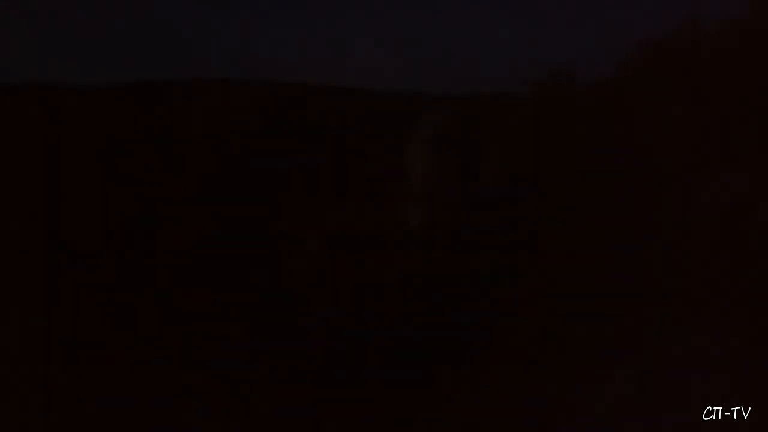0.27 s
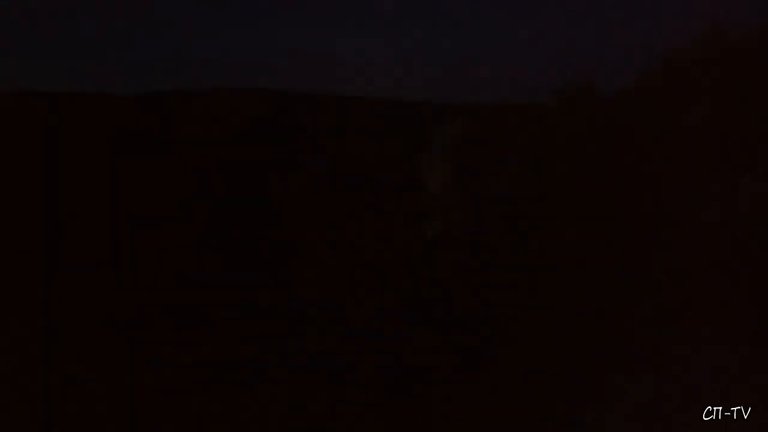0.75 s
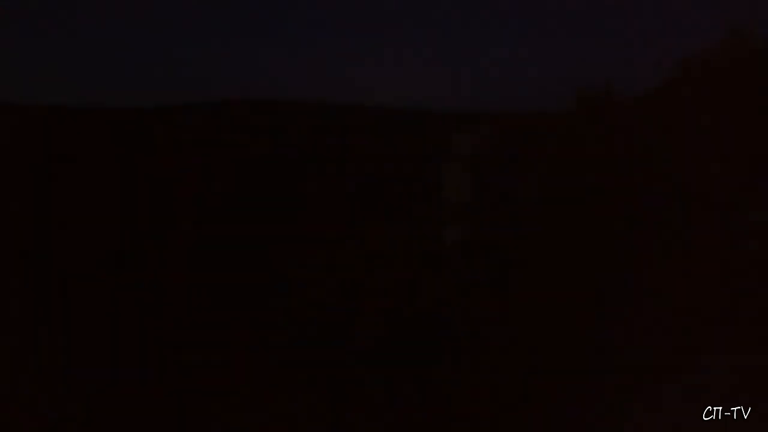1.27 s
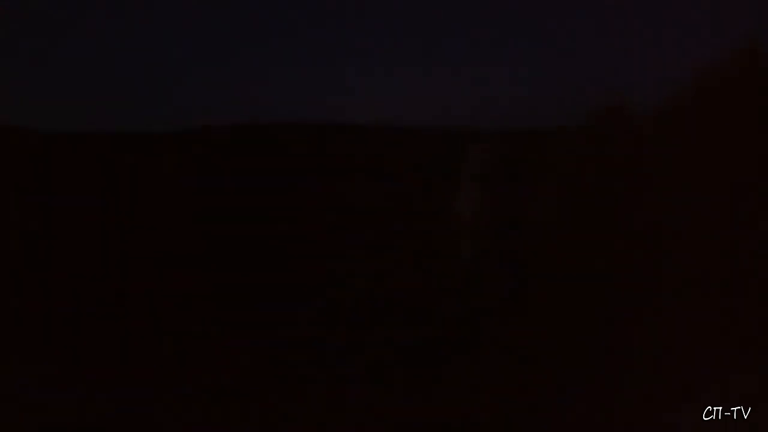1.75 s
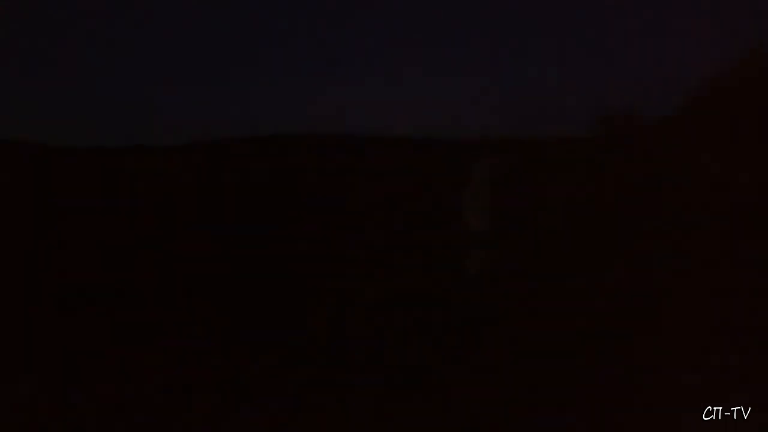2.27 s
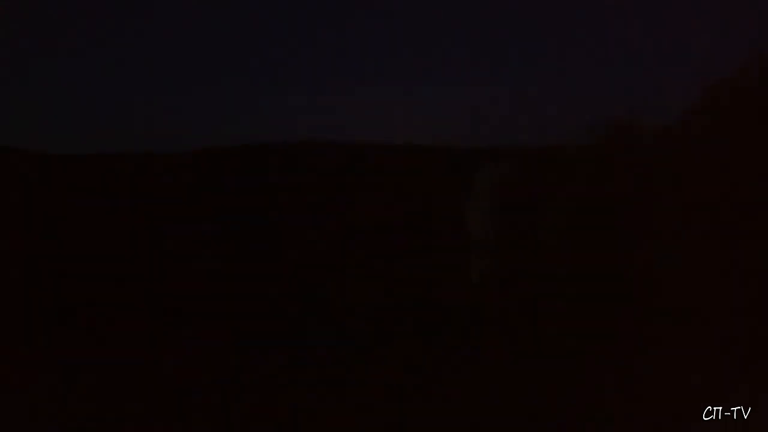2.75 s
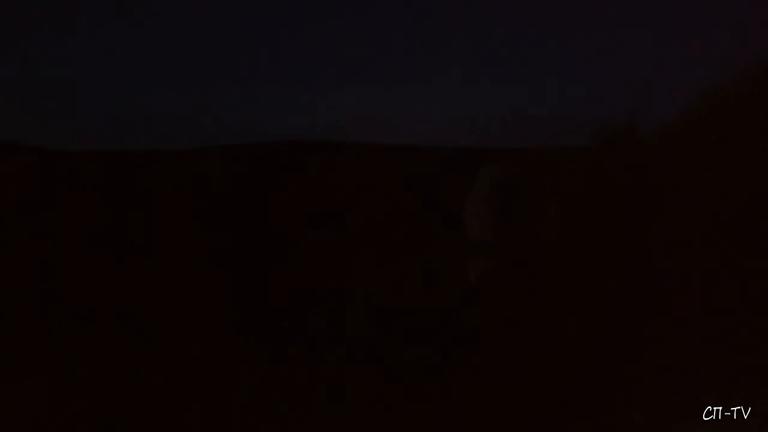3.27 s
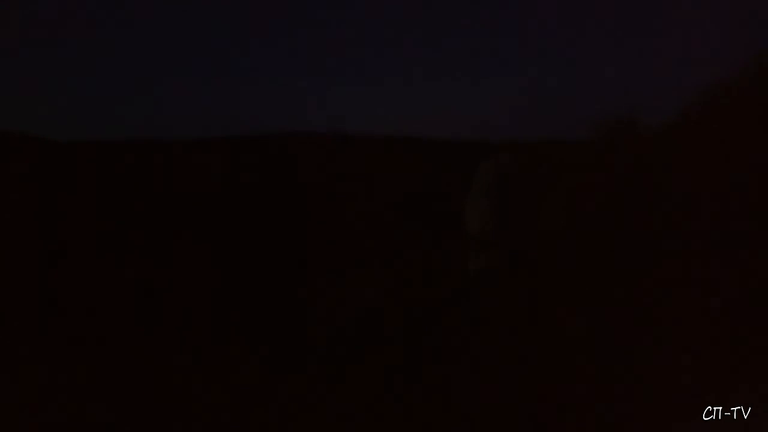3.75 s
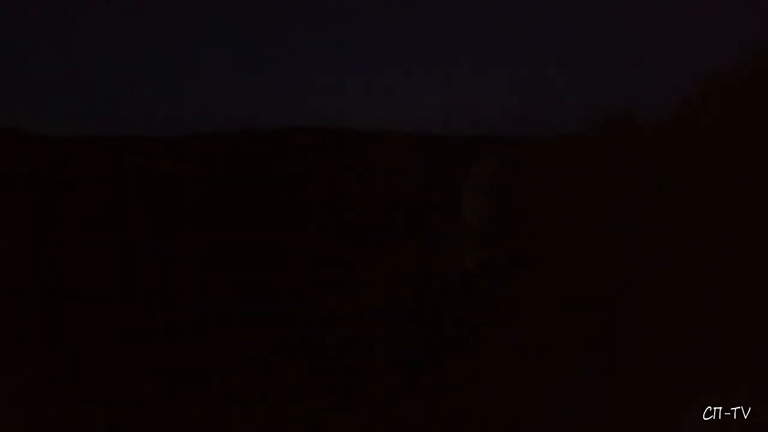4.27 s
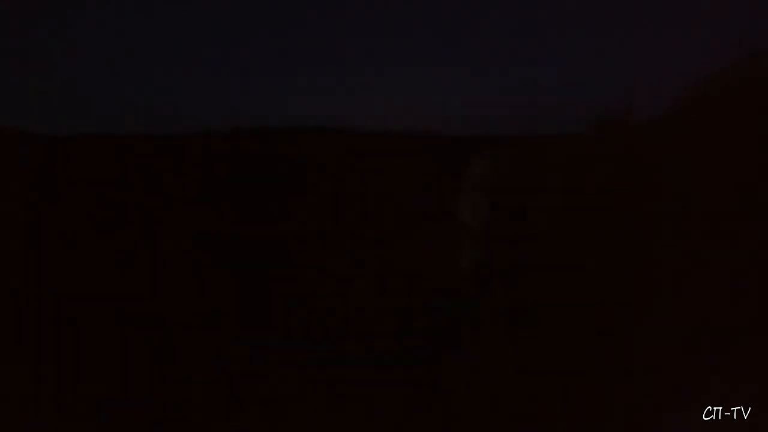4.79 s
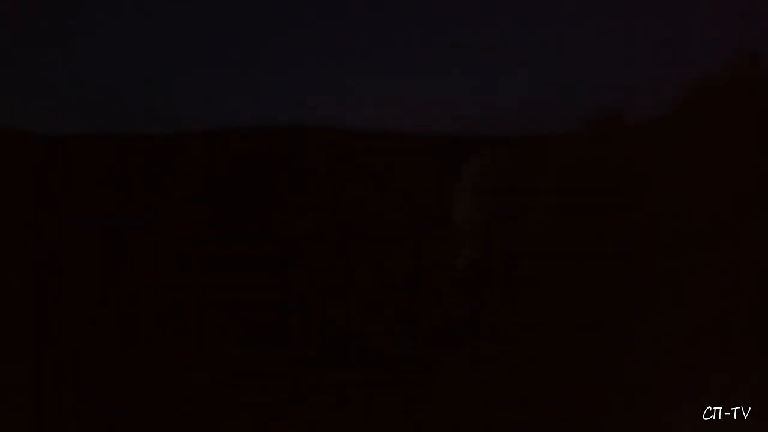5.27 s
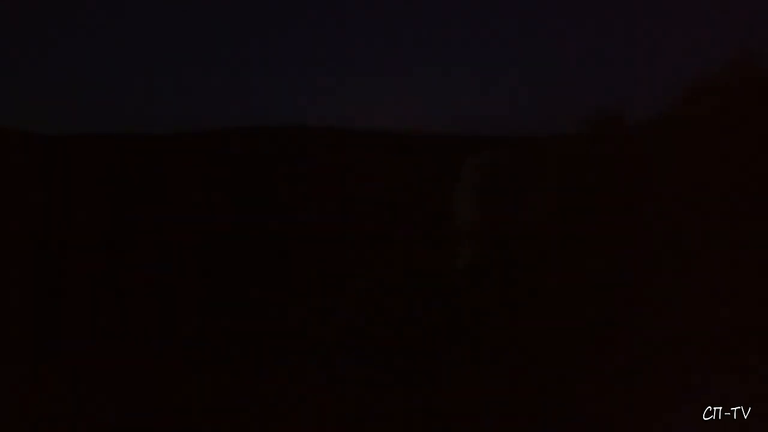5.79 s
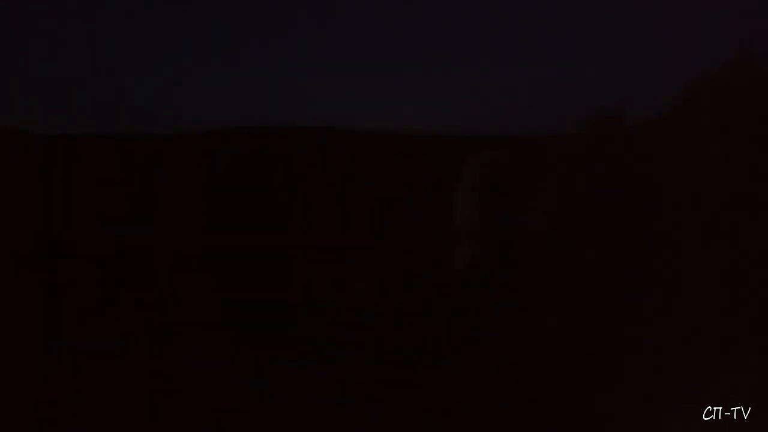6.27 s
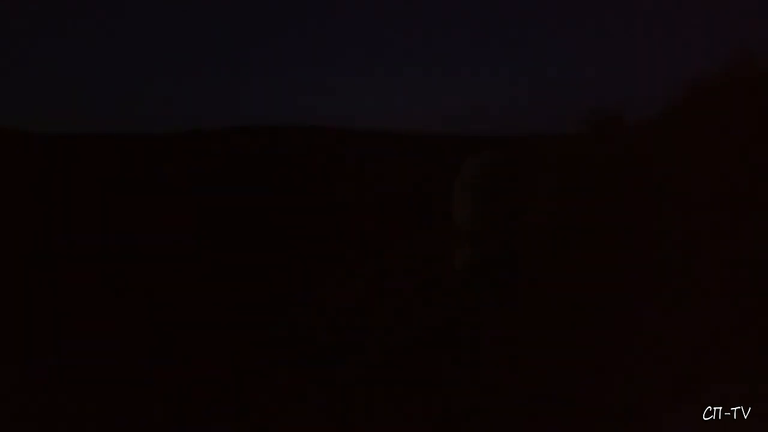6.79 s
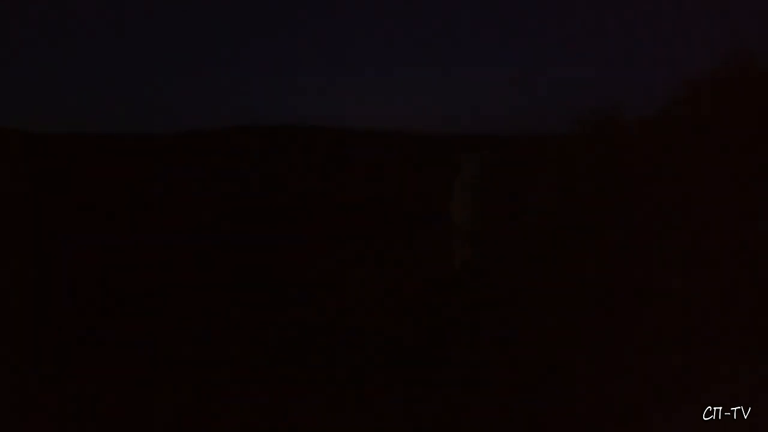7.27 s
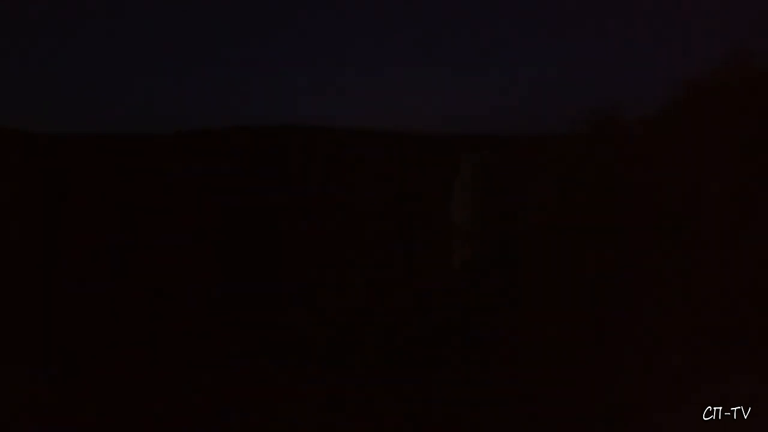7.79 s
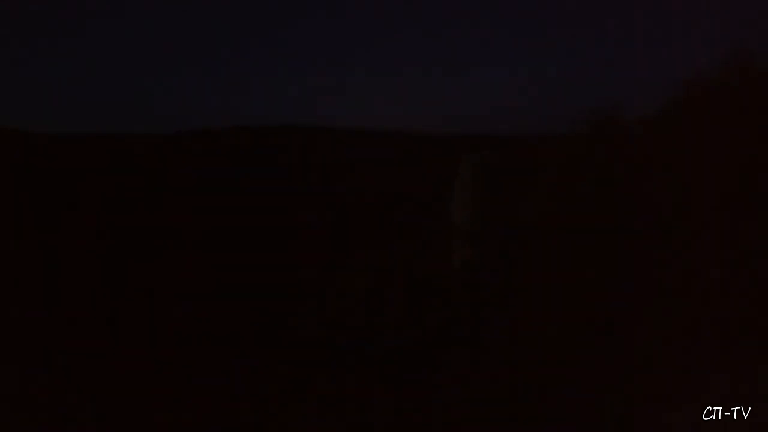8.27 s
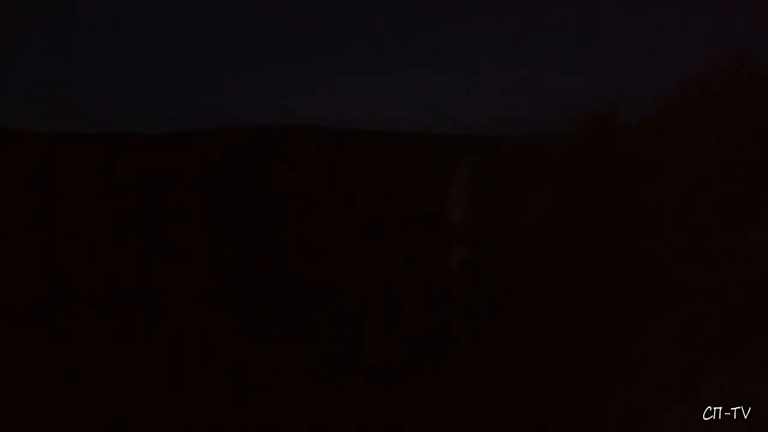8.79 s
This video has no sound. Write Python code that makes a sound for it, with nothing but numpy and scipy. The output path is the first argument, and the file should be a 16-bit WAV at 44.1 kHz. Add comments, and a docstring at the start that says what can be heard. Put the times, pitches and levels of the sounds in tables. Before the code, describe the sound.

Outdoor chorus before dawn, wide and reverberant. Mid-distance thrushes whistle short, sliding notes constantly while farther birds merge into a swelling wash. A clear robin sings high, quick glides at about two to three seconds; later come small trills, two sharp upward whips and regular pulsed flicks. A dull click sounds near the start, with a soft microphone bump later and quiet background air.

```python
"""Dawn chorus at the edge of a wood

A robin sings close by, thrushes whistle further off, small birds trill and buzz, far ones merge into a wash.
Voices are gliding sines, with a fast warble for the buzzes; the trees scatter them into echoes and a tail.
Beneath lie a faint far rumble and a high hiss of shaped noise, a thin tone, a hoot, clicks and a soft bump."""
import sys
import numpy as np
from scipy import signal
from scipy.fft import rfft, irfft
from scipy.io import wavfile
from scipy.ndimage import uniform_filter1d

SR = 44100
rng = np.random.default_rng(int(sys.argv[2]) if len(sys.argv) > 2 else 0)


def output_pcm(signal):
    """Save a mono or channel-first signal as 16-bit PCM at the path in sys.argv[1].

    Samples are clipped to [-1, 1] before scaling.
    """
    pcm = np.clip(np.atleast_2d(signal).T, -1, 1) * 32767
    wavfile.write(sys.argv[1], SR, np.round(pcm).astype(np.int16))


N = 398663
TIME = np.arange(N) / SR  # seconds

# How the wood answers a near, a middling and a far source. Each holds: level of the separate echoes
# in dB against the direct sound, their 60 dB decay time in seconds, then the same two for the deep tail.
CLOSE = (-5.5, .24, -15.5, .85)
MIDWAY = (-3.5, .3, -10.5, .9)
FAR = (0.5, .35, -4, 1.1)
# Swelling of the far whistlers. Each row: time in seconds, level in dB before the layer's gain.
WHISTLER_SWELL = [(0.1, -37.5), (0.37, -41), (0.75, -38.5), (0.89, -42.5), (2.66, -43), (2.86, -40),
                  (3.11, -40), (3.61, -44), (3.98, -47), (4.98, -44), (5.08, -43), (5.3, -51),
                  (5.43, -40.5), (5.8, -40.5), (7.52, -37), (7.67, -44.5), (8.66, -39.5), (9.04, -46)]


def from_db(db):
    """Decibels are twenty times the logarithm of an amplitude ratio; this inverts them."""
    return 10 ** (np.asarray(db) / 20)


def rms_one(x):
    """Root-mean-square normalisation: equal mean power for every sound."""
    return x / np.sqrt(np.mean(x ** 2) + 1e-20)


def add(track, s, sound):
    """Superposition: pressures add, here from time s in seconds."""
    i = int(round(s * SR))
    lo, hi = max(i, 0), min(i + len(sound), N)
    if hi > lo:
        track[lo:hi] += sound[lo - i:hi - i]


def wander(rate):
    """Band-limited chance: Gaussian knots, rate of them a second, joined by straight lines."""
    knots = rng.standard_normal(N // 20)
    return np.interp(TIME * rate, np.arange(len(knots)), knots)


def coloured_noise(spectrum):
    """Spectral shaping: white noise is weighted frequency by frequency, then set to rms 1."""
    hz, db = np.transpose(spectrum)
    bins = np.maximum(np.arange(N // 2 + 1) * SR / N, 1)
    weights = from_db(np.interp(np.log(bins), np.log(hz), db))
    return rms_one(irfft(rfft(rng.standard_normal(N)) * weights, N))


def whistle(length, first, middle, last, edge=0.083, bend=0):
    """Frequency modulation: a sine's phase sums a pitch that arcs through three values; rms 1."""
    u = np.linspace(0, 1, max(int(length * SR), 8))
    # the parabola through the first, middle and last pitch
    hz = first * (1 - u) * (1 - 2 * u) + 4 * middle * u * (1 - u) + last * u * (2 * u - 1)
    hz = hz * (1 + np.resize(bend, len(u)))
    # edge is the share of the note spent rising, and again falling
    nearest_end = np.minimum(u, 1 - u)
    swell = np.sin(np.pi / 2 * np.minimum(nearest_end / max(edge, .01), 1))
    return rms_one(swell * np.sin(2 * np.pi * np.cumsum(hz) / SR))


def sing(notes, bend, edge):
    """Superposed syllables whose pitches share one unsteadiness, a fraction of the pitch."""
    out = np.zeros(N)
    for s, length, first, middle, last, db in notes:
        note = whistle(length, first, middle, last, edge, bend[int(max(s, 0) * SR):])
        add(out, s, from_db(db) * note)
    return out


def woodland(x, early_db, early_t60, late_db, late_t60, echoes_per_s=900):
    """Multiple scattering: direct sound, sparse echoes from trunks and boughs, a dense tail from the deep wood."""
    t = TIME[:SR * 3 // 2]
    early, late = rng.standard_normal((2, len(t)))
    early = early * (rng.random(len(t)) < echoes_per_s / SR)
    # each part builds up within milliseconds, then decays exponentially
    early = early * from_db(-60 * t / early_t60) * (1 - np.exp(-t / 0.0075))
    late = late * from_db(-60 * t / late_t60) * (1 - np.exp(-t / 0.0095))
    echoes = from_db(early_db) * early / np.linalg.norm(early)
    echoes = echoes + from_db(late_db) * late / np.linalg.norm(late)
    # one bounce off the ground beats against every gliding note
    echoes[int(.0065 * SR)] += from_db(-10)
    return x + signal.fftconvolve(x, echoes)[:N]


def slur(s, length, first, last, db):
    """Decelerating glide: 72 % of the pitch change is made by the note's midpoint."""
    return s, length, first, first + .72 * (last - first), last, db


def faint_slurs(length_s=.09, glide=0.099, count=30):
    """Stratified chance: one faint thrush note in each equal slot, its level following the far whistlers."""
    # Loudness over the thrushes' range. Each row: pitch in Hz, level in dB against the far whistlers.
    register = [(1650, -4), (2100, -2), (2400, -9), (2700, -16)]
    hz, db = np.transpose(register)
    notes = []
    for k, (when, height, slope, long) in enumerate(rng.random((count, 4))):
        s = (k + when) / count * N / SR
        pitch = hz[0] * (hz[-1] / hz[0]) ** height
        step = np.exp(glide * (2 * slope - 1))
        level_db = np.interp(s, *np.transpose(WHISTLER_SWELL)) + np.interp(pitch, hz, db)
        notes.append(slur(s, length_s * (.5 + long), pitch * step, pitch / step, level_db))
    return notes


def thrushes(midway_db=-0.5, far_db=2.0, unsteady=0.0059, far_below_db=-45):
    """Low slurred whistles inside the wood: with distance the scattered sound outweighs the direct."""
    # Thrush notes that stand out of the chorus. Each row: start in seconds, length in seconds,
    # first pitch in Hz, last pitch in Hz, level in dB before the layer's gain.
    clear_notes = [(0, 0.054, 3300, 2385, -38), (0, 0.063, 2043, 1513, -41.5),
                   (0.064, 0.042, 4850, 3980, -51.5), (0.091, 0.14, 2335, 2392, -36.5),
                   (0.172, 0.18, 2283, 2080, -37.5), (0.208, 0.096, 3950, 4640, -56.5),
                   (0.314, 0.19, 3143, 2740, -37.5), (0.426, 0.031, 1080, 1160, -55),
                   (0.491, 0.051, 1984, 1905, -35.5), (0.752, 0.13, 2110, 2188, -41),
                   (0.831, 0.055, 1255, 1515, -51), (0.878, 0.027, 1264, 1023, -51.5),
                   (1.075, 0.11, 2450, 2560, -49), (1.288, 0.15, 2280, 2073, -41.5),
                   (1.505, 0.052, 2017, 1650, -41.5), (1.829, 0.041, 2432, 2208, -35.5),
                   (1.904, 0.087, 2095, 1902, -37), (1.996, 0.073, 4320, 4720, -59.5),
                   (2.174, 0.093, 2800, 2427, -39), (2.266, 0.08, 2574, 2960, -41.5),
                   (2.333, 0.08, 2750, 2238, -40), (2.432, 0.12, 1790, 1514, -51),
                   (2.645, 0.081, 2373, 2020, -34), (2.822, 0.12, 2144, 2294, -40.5),
                   (2.948, 0.061, 2396, 2405, -33), (3.368, 0.069, 1964, 1930, -37.5),
                   (3.621, 0.073, 2300, 1860, -42), (3.641, 0.049, 3950, 3700, -57.5),
                   (3.738, 0.084, 2940, 2793, -39), (3.828, 0.06, 2700, 2335, -41.5),
                   (3.951, 0.05, 3510, 2880, -54), (4.016, 0.15, 2837, 2760, -48),
                   (4.279, 0.1, 4000, 2970, -55.5), (4.456, 0.083, 1670, 1775, -50.5),
                   (4.473, 0.076, 3470, 3810, -58), (4.596, 0.015, 4500, 4040, -56.5),
                   (5.24, 0.053, 2114, 2096, -37.5), (5.307, 0.067, 1893, 2060, -39),
                   (5.633, 0.071, 2453, 2185, -38.5), (5.699, 0.075, 2134, 1866, -37.5),
                   (5.748, 0.095, 3100, 4460, -57.5), (5.829, 0.085, 2247, 2166, -30.5),
                   (5.96, 0.021, 2930, 2895, -43), (5.846, 0.14, 1220, 1377, -55.5),
                   (6.073, 0.067, 2266, 2042, -30.5), (6.215, 0.057, 2234, 2563, -32),
                   (6.247, 0.048, 2660, 2960, -42.5), (6.44, 0.14, 2390, 2220, -41.5),
                   (6.561, 0.074, 2410, 2934, -43), (6.659, 0.12, 2270, 2064, -43.5),
                   (6.741, 0.02, 1194, 1024, -52), (7.074, 0.048, 1084, 1061, -53.5),
                   (7.358, 0.1, 2080, 2000, -43), (7.625, 0.045, 1910, 1870, -40),
                   (7.948, 0.045, 3360, 3050, -37.5), (8.145, 0.1, 1275, 1430, -44.5),
                   (8.336, 0.074, 1740, 1796, -33), (8.676, 0.054, 2720, 3094, -40.5),
                   (8.719, 0.14, 2078, 2266, -32.3), (8.757, 0.028, 4120, 3720, -50.5)]
    bend = unsteady * wander(150)
    notes = [slur(*note) for note in clear_notes] + faint_slurs()
    midway = sing([note for note in notes if note[-1] > far_below_db], bend, edge=.2)
    far = sing([note for note in notes if note[-1] <= far_below_db], bend, edge=.25)
    return from_db(midway_db) * woodland(midway, *MIDWAY) + from_db(far_db) * woodland(far, *FAR)


def flock(centre_hz, spread, glide, length, count, uneven_db=2.5):
    """Random superposition: many scattered singers merge, strongest in mid-register, with running rms near 1."""
    out = np.zeros(N)
    starts = (np.arange(count) + rng.random(count)) / count * (N / SR + length) - length
    for s, (pitch, a, b, long, force) in zip(starts, rng.uniform(-2, 2, (count, 5))):
        arc = centre_hz * np.exp(spread * pitch + glide * np.array([a, 0, b]))
        note = whistle(length * np.exp(.35 * long), *arc, edge=.3)
        add(out, s, from_db(uneven_db * force) * note)
    band_hz = centre_hz * np.exp(1.25 * spread * np.array([-1, 1]))
    register = signal.butter(2, band_hz, "band", fs=SR, output="sos")
    wash = signal.sosfilt(register, woodland(out, *FAR))
    return wash / np.sqrt(uniform_filter1d(wash ** 2, SR // 8) + 1e-12)


def far_chorus(whistlers_db=0.5, middle_db=-1.5, twitterers_db=-67.0):
    """Amplitude modulation: two distant registers swell and thin separately below a steady high twitter."""
    # Swelling of the far middle voices. Each row: time in seconds, level in dB before the layer's gain.
    middle_curve = [(0.1, -52.5), (0.35, -50), (0.55, -62), (0.72, -40), (1.27, -73), (1.84, -58),
                    (2.16, -45.5), (2.61, -60), (3.09, -51), (3.36, -41.5), (4.03, -48.5), (4.53, -73),
                    (4.86, -52.5), (6.25, -63), (6.42, -58), (6.82, -57.5), (7.32, -44), (9.04, -51)]
    low_swell = np.interp(TIME, *np.transpose(WHISTLER_SWELL))
    middle_swell = np.interp(TIME, *np.transpose(middle_curve))
    whistlers = flock(centre_hz=2057, spread=.125, glide=.09, length=.062, count=600)
    middle = flock(centre_hz=2817, spread=.09, glide=0.0906, length=.045, count=560)
    twitterers = flock(centre_hz=5510, spread=0.1, glide=0.072, length=0.051, count=600)
    whistlers = from_db(low_swell + whistlers_db) * whistlers
    middle = from_db(middle_swell + middle_db) * middle
    return whistlers + middle + from_db(twitterers_db) * twitterers


def thin_tone():
    """A faint sine, randomly modulated in frequency about 5290 Hz and slowly in level."""
    hz = 5290 + 30 * wander(150)
    return from_db(-68 + 3 * wander(6)) * np.sin(2 * np.pi * np.cumsum(hz) / SR)


def far_rumble_and_air(level_db=-54.5):
    """Stationary noise: far rumble and still air share one continuous spectrum."""
    # Spectrum of the background. Each row: frequency in Hz, relative density in dB per Hz.
    spectrum = [(20, -22), (35, -14), (60, -7), (90, -0.5), (130, -1), (250, -4.5), (500, -8), (1000, -13),
                (2000, -6.5), (5000, -19), (7500, -27.5), (9000, -41), (16000, -35)]
    return from_db(level_db) * coloured_noise(spectrum)


def repeat(motif, renditions):
    """Translation in time: a motif keeps its shape and shifts in start and level."""
    return [(s + delay, length, first, middle, last, db + relative_db, depth)
            for s, db in renditions for delay, length, first, middle, last, relative_db, depth in motif]


def buzzers(level_db=0.0, warble_hz=170, uneven=0.22, flutter_db=4.5, close_above_db=-36):
    """Fast frequency modulation: a narrow warble is heard as a burr, a wide one as a rasp."""
    # Lone warbled notes. Each row: start in seconds, length in seconds, first, middle and last pitch in Hz,
    # level in dB before flutter and gain, warble depth as a share of the pitch.
    lone_notes = [(0.3, 0.028, 3660, 3610, 3430, -44, 0.07), (0.285, 0.086, 5860, 5620, 5450, -54.5, 0.087),
                  (1.197, 0.034, 4960, 5050, 5030, -51, 0.026),
                  (1.862, 0.17, 2920, 2750, 2440, -44.5, 0.094),
                  (2.846, 0.35, 3830, 3980, 4070, -60, 0.075), (4.16, 0.096, 6280, 6260, 6000, -57, 0.062),
                  (3.02, 0.052, 2720, 3066, 2660, -47, 0.055),
                  (4.866, 0.11, 3200, 3050, 2730, -50.5, 0.065),
                  (5.031, 0.044, 5040, 4900, 4150, -58.5, 0.17),
                  (6.709, 0.19, 3750, 4016, 3980, -50.5, 0.047),
                  (7.48, 0.09, 4380, 4500, 4600, -50.5, 0.13), (8.352, 0.034, 4810, 4160, 3500, -43, 0.23)]
    # Syllables of the repeated motifs. Each row: delay from the main syllable in seconds, length in seconds,
    # first, middle and last pitch in Hz, relative level in dB, warble depth as a share of the pitch.
    chirp = [(0, 0.035, 4210, 3850, 3440, 0, 0.0095), (.034, .045, 3460, 3100, 2730, -5, .04)]
    rasp = [(0, 0.053, 6020, 6130, 6200, 0.0076, 0.093)]
    whip = [(-.03, .056, 4500, 4990, 5950, -13.5, 0.052), (0, 0.0365, 5950, 6146, 5920, -0.5, 0.041),
            (.051, .058, 3360, 2950, 2730, -16, 0.063), (.075, .045, 4280, 4140, 3870, -24, 0.086)]
    tsip = [(-.036, 0.035, 8000, 7800, 7770, -6.5, 0.022), (0, .016, 7640, 6630, 6000, -5, .01)]
    tseeu = [(-.105, .118, 7980, 7900, 7970, -13.5, .028), (0, 0.037, 7740, 7100, 6600, -1.5, 0.013),
             (0, .06, 4520, 4540, 4540, -3, .042), (.09, .022, 5500, 5100, 4410, 4.5, 0.14)]
    tick = [(0, .01, 2660, 3180, 4160, 0, 0.011), (.011, 0.0071, 6250, 6480, 6500, -1, .01)]
    # When each motif is sung. Each row: time in seconds, level in dB before flutter and gain.
    chirp_times = [(0.634, -37), (0.806, -35)]
    rasp_times = [(0.66, -53.5), (0.818, -51.5), (0.9, -45.5), (1.016, -49.5), (1.405, -58), (1.515, -57.5),
                  (1.63, -55.5), (1.743, -56)]
    whip_times = [(6.921, -23.5), (7.157, -24.5)]
    tsip_times = [(5.214, -59), (5.302, -52.5), (5.404, -52)]
    tseeu_times = [(7.84, -44), (8.156, -45.5)]
    tick_times = [(8.537, -43.5), (8.898, -45.5)]
    motifs = (repeat(chirp, chirp_times) + repeat(rasp, rasp_times) + repeat(whip, whip_times)
              + repeat(tsip, tsip_times) + repeat(tseeu, tseeu_times) + repeat(tick, tick_times))

    rate_hz = warble_hz * (1 + uneven * wander(150))
    warble = np.sin(2 * np.pi * np.cumsum(rate_hz) / SR)
    close, further = np.zeros((2, N))
    for s, length, first, middle, last, db, depth in lone_notes + motifs:
        note = whistle(length, first, middle, last, .3, depth * warble[int(s * SR):])
        add(close if db > close_above_db else further, s, from_db(db) * note)
    further = further * from_db(flutter_db * wander(120))  # the fainter notes flutter in level
    return from_db(level_db) * (woodland(close, *CLOSE) + woodland(further, *MIDWAY))


def clicks(t60=0.014):
    """Damped resonance: soft touches on the camera body ring as sines that die within milliseconds."""
    # Touches. Each row: time in seconds, ringing frequency in Hz, starting level in dB.
    touches = [(1.001, 900, -51), (1.255, 480, -39), (1.949, 7000, -55), (5.361, 950, -50)]
    out, t = np.zeros(N), TIME[:SR // 20]
    for s, hz, db in touches:
        add(out, s, from_db(db - 60 * t / t60) * np.sin(2 * np.pi * hz * t))
    return out


def near_birds(close_db=-0.5, further_db=0.0, unsteady=0.013, close_above_db=-37):
    """Direct-to-scattered ratio: pure near notes stand clear, fainter ones further off carry more tail."""
    # Clear syllables of the nearest birds. Each row: start in seconds, length in seconds,
    # first, middle and last pitch in Hz, level in dB before the layer's gain.
    syllables = [(1.303, 0.035, 7400, 7020, 6860, -52.5), (2.129, 0.049, 6060, 5863, 5810, -28),
                 (2.22, 0.052, 6530, 6350, 6000, -27), (2.33, 0.053, 4750, 5800, 6750, -28.5),
                 (2.363, 0.062, 6640, 5520, 4190, -30.5), (2.54, 0.125, 4584, 5026, 4426, -33.5),
                 (2.77, 0.064, 4230, 3935, 3840, -40), (2.802, 0.033, 4490, 5720, 5420, -28.5),
                 (3.17, 0.053, 7330, 7310, 7740, -45), (3.185, 0.092, 4010, 4090, 4170, -41.5),
                 (3.242, 0.044, 7260, 5780, 5850, -27.5), (3.28, 0.093, 5400, 5580, 5990, -28.5),
                 (3.435, 0.087, 4020, 4210, 4240, -44.5), (3.92, 0.025, 6560, 5870, 5630, -46.5),
                 (4.471, 0.099, 5250, 5110, 5550, -43), (4.53, 0.062, 5250, 6690, 5400, -42),
                 (5.699, 0.067, 5220, 6220, 7080, -49.5)]
    bend = unsteady * wander(400)
    close = sing([note for note in syllables if note[-1] > close_above_db], bend, edge=.35)
    further = sing([note for note in syllables if note[-1] <= close_above_db], bend, edge=.3)
    return from_db(close_db) * woodland(close, *CLOSE) + from_db(further_db) * woodland(further, *MIDWAY)


def trillers(level_db=0.0, vary=0.016, vary_db=2.13):
    """Periodic repetition: one gliding flick recurs at a fixed period, varying in pitch and force."""
    # Trills. Each row: start in seconds, end in seconds, period in seconds, note length in seconds,
    # first pitch in Hz, last pitch in Hz, mean level in dB before the layer's gain.
    trills = [(1.413, 1.8, 0.1, 0.077, 3120, 3750, -57), (4.612, 4.76, 0.062, 0.016, 8200, 7260, -59.5),
              (6.408, 6.74, 0.06, 0.023, 3810, 3080, -44.5), (6.411, 6.85, 0.0318, 0.012, 6690, 5850, -43),
              (7.413, 9.1, 0.1335, 0.0113, 6400, 4660, -45.5),
              (7.444, 9.0, 0.1335, 0.019, 3150, 2200, -38.5)]
    out = np.zeros(N)
    bend = .018 * wander(350)
    for start, end, period, length, first, last, db in trills:
        for s, (pitch, force) in zip(np.arange(start, end, period), rng.standard_normal((20, 2))):
            arc = np.array([first, np.sqrt(first * last), last]) * (1 + vary * pitch)
            note = whistle(length, *arc, edge=0.26, bend=bend[int(s * SR):])
            add(out, s, from_db(db + vary_db * force) * note)
    return from_db(level_db) * woodland(out, *MIDWAY)


def microphone_bump():
    """Low-frequency pulse: a soft bump on the microphone, with no echo from the wood."""
    bump = np.zeros(N)
    add(bump, 7.15, from_db(-53) * whistle(0.054, 90, 127, 120, edge=.4))
    return bump


def far_hoot():
    """A low falling tone with more scattered than direct sound, hence heard as distant."""
    hoot = np.zeros(N)
    add(hoot, 8.84, from_db(-57.5) * whistle(0.054, 750, 733, 646))
    return woodland(hoot, *FAR)


def scene():
    """Linear superposition of all the sources, alike in both channels."""
    birds = thrushes() + far_chorus() + buzzers() + near_birds() + trillers()
    small_sounds = thin_tone() + clicks() + microphone_bump() + far_hoot()
    mono = birds + small_sounds + far_rumble_and_air()
    return np.array([mono, mono])


def record(dry, hiss_db=-67, cutoff_hz=15800):
    """Additive noise and band limiting: a faint steady hiss lies over everything, and the top is cut."""
    # Spectrum of the high hiss, strongest near 15 kHz. Each row: frequency in Hz, relative density in dB per Hz.
    hiss_spectrum = [(20, -19.5), (13800, -11.5), (14600, -4.5), (15400, 1), (16000, -5)]
    hissy = dry + from_db(hiss_db) * coloured_noise(hiss_spectrum)
    # 0.1 dB of ripple below the cutoff, 80 dB of rejection above
    lowpass = signal.ellip(12, .1, 80, cutoff_hz, fs=SR, output="sos")
    return signal.sosfilt(lowpass, hissy)


dry = scene()
out = record(dry)
output_pcm(out)
```